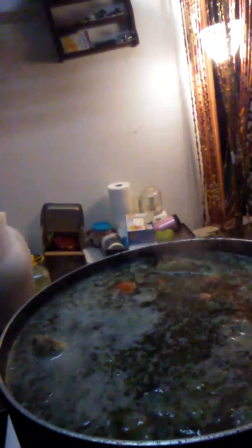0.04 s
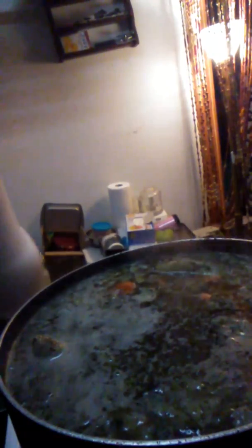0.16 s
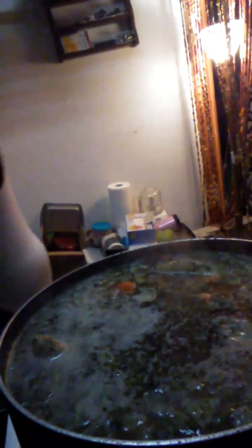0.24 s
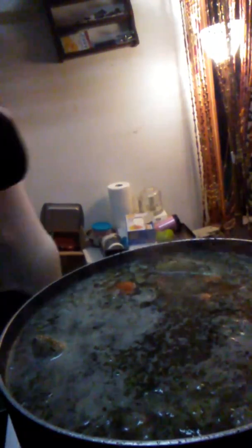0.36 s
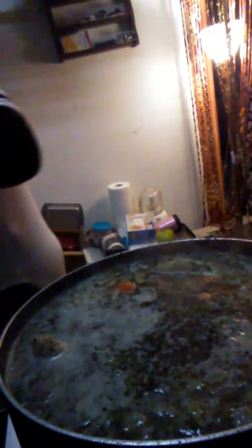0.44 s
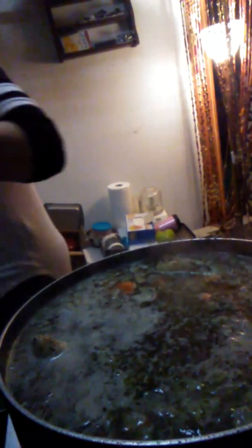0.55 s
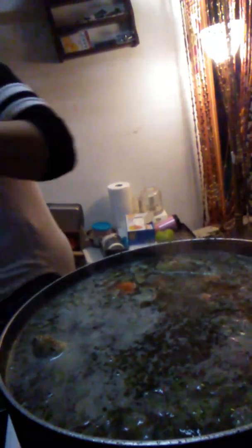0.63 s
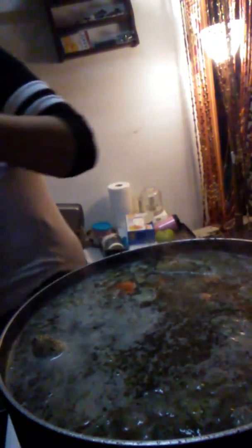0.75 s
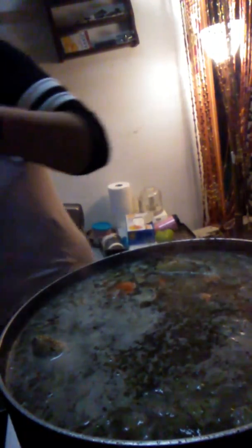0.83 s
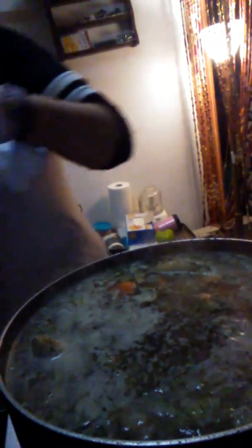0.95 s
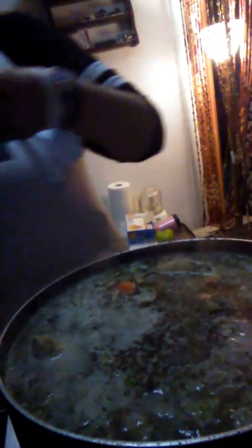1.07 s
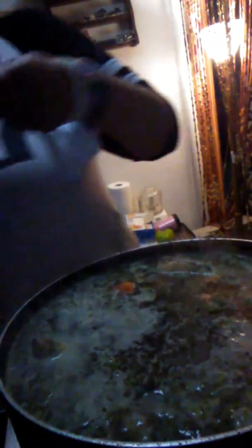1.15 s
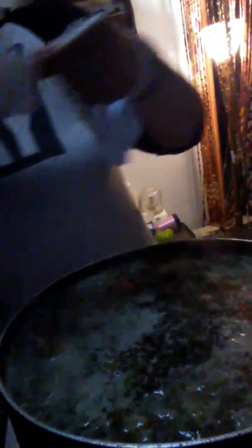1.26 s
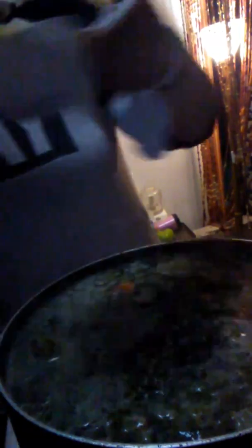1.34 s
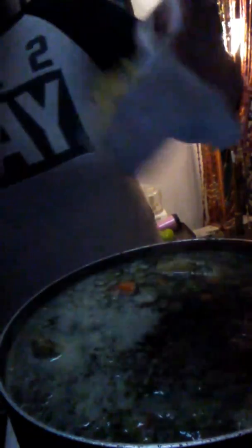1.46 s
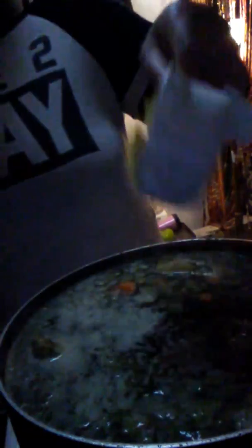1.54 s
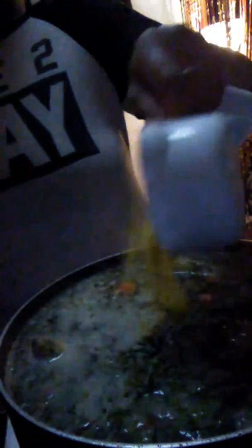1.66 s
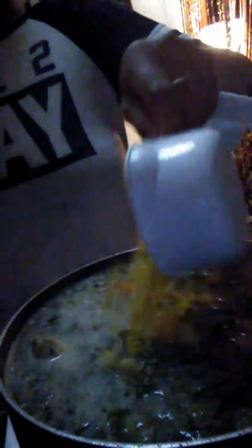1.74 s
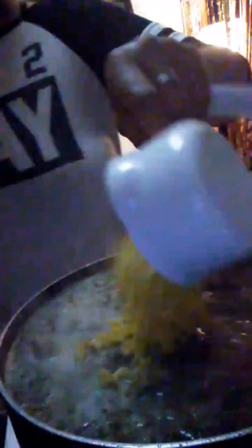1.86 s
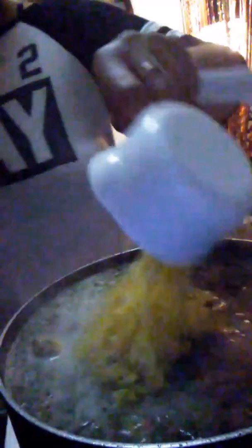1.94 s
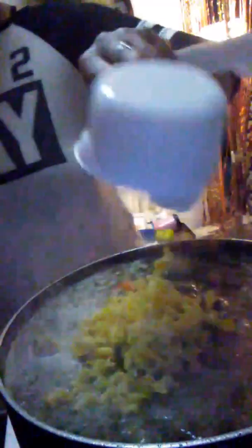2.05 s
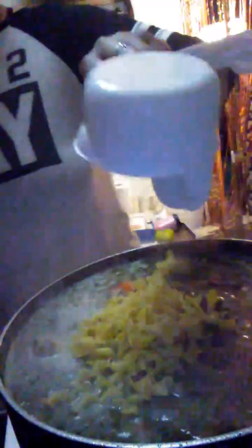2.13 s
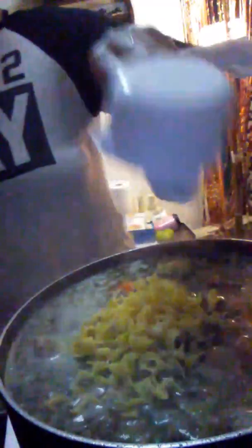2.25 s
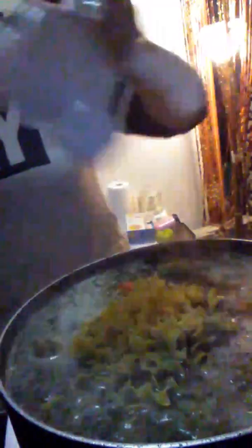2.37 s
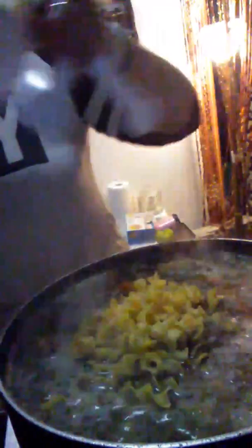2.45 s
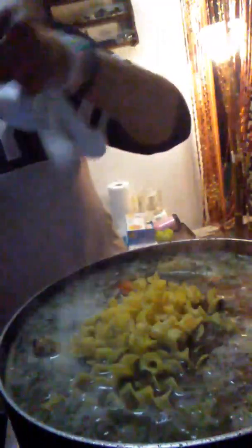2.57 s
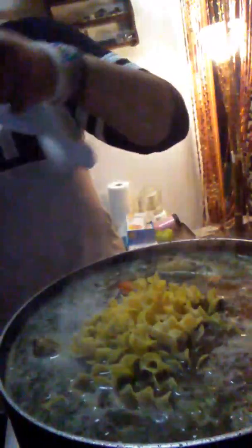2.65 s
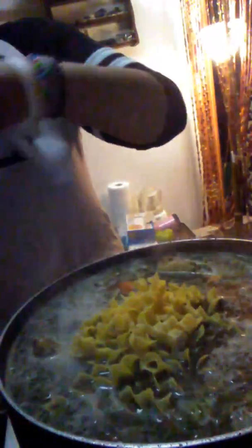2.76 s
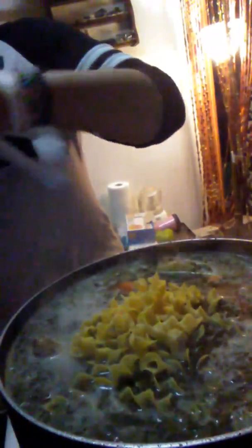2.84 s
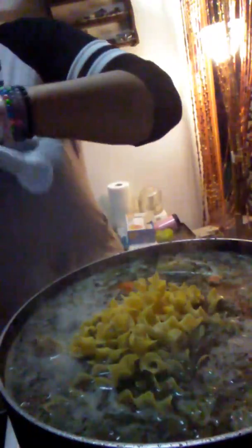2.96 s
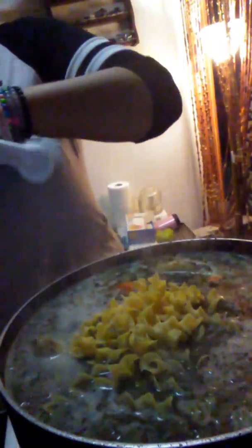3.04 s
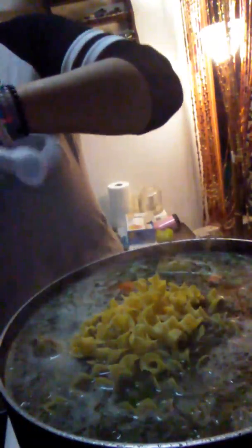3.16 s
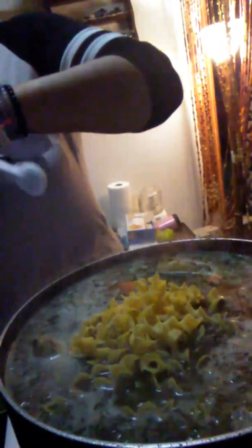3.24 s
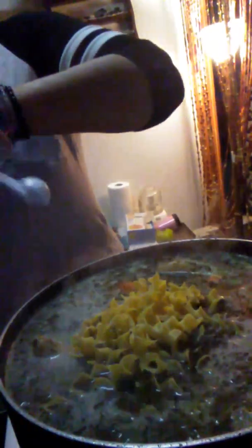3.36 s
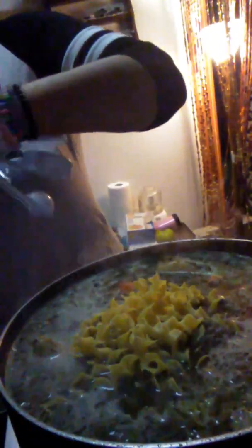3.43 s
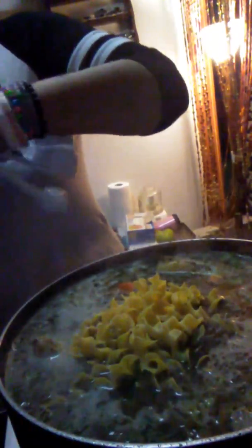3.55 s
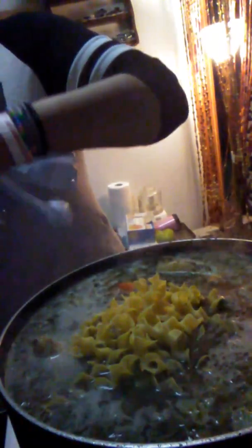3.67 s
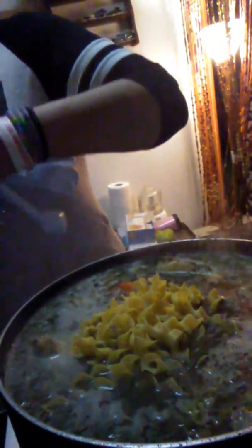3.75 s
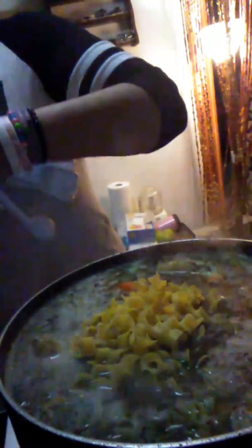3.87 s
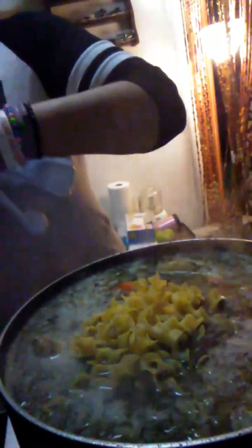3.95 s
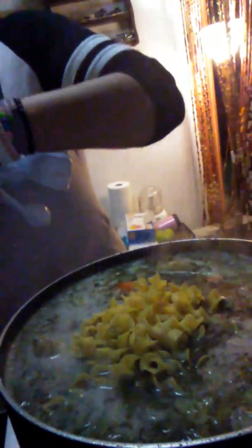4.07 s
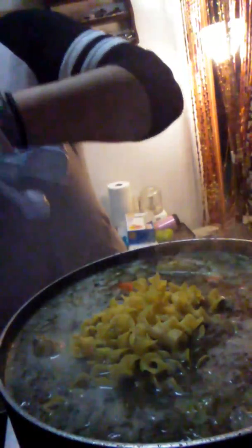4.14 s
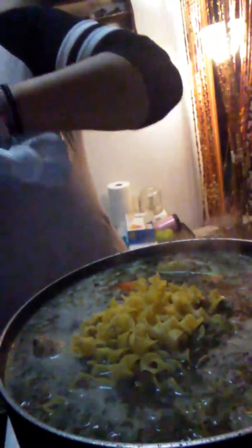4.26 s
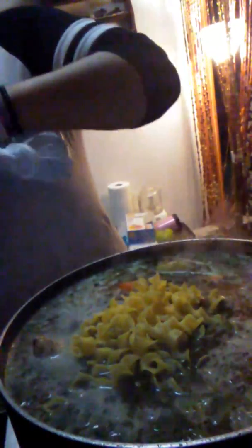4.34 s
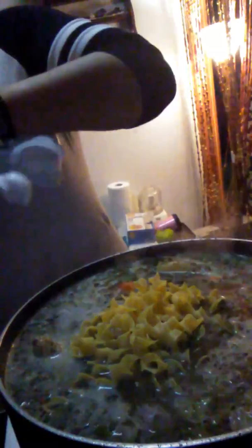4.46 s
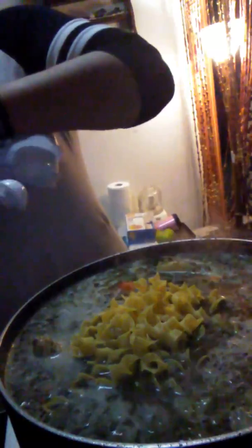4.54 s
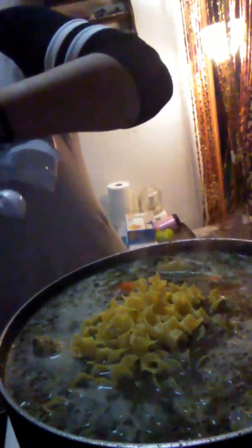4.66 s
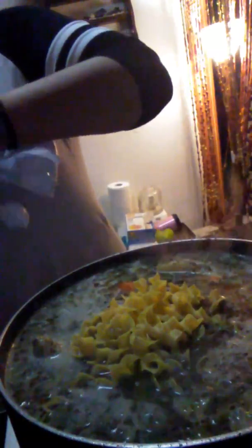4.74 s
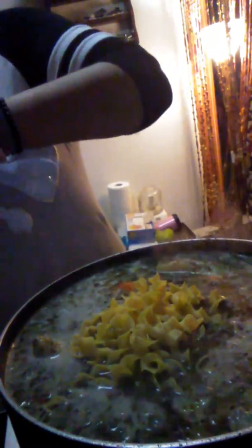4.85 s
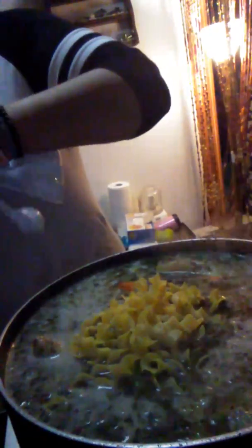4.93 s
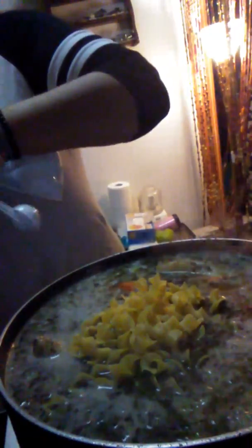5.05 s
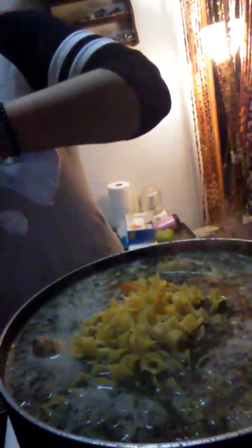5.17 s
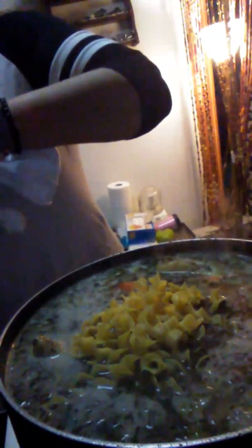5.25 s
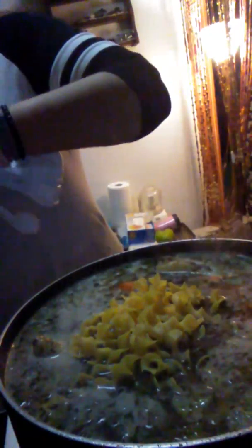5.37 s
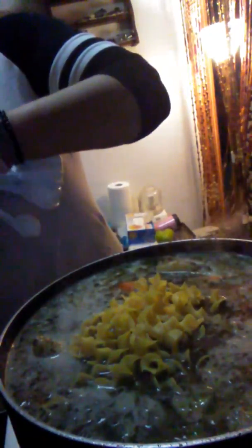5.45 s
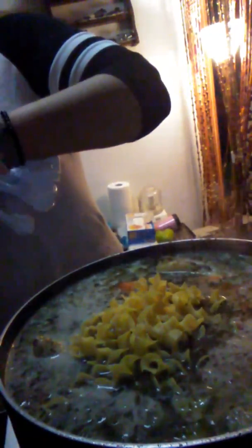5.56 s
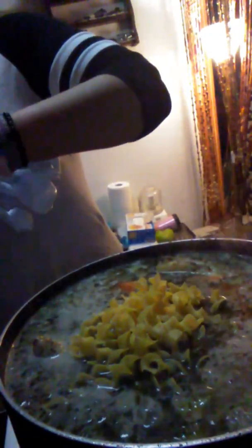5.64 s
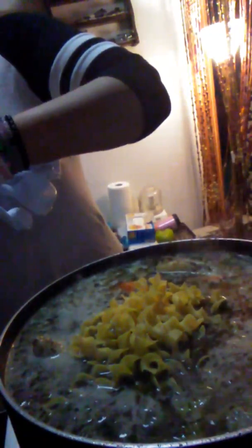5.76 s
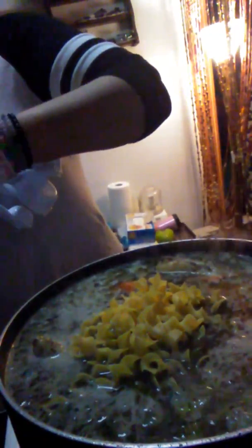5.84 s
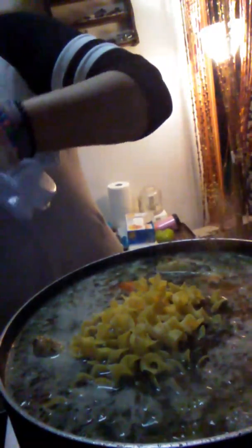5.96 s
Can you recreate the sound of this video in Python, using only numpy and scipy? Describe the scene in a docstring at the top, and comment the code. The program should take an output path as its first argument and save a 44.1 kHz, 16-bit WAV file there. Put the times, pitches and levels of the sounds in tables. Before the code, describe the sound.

Over faint simmering broth, scattered plastic crackles lead to a quick rattling pour of dry noodles, then long, dense crinkly shaking from a bag.

```python
"""In a small hard kitchen, beside a simmering pot, broth hiss and stove rumble run throughout as filtered noise.
Sparse snaps and crackle come first; then dry noodles are tipped from a plastic cup into the broth near 1.7 s.
After a lull, noodles are shaken from a crinkling bag into the cup from about 2.9 s to the end.
Random collisions ring small pieces and hollow air; single snaps, scrapes, thuds and cup knocks are placed one by one.
Rattle, snaps, scrapes and knocks feed short kitchen echoes; the microphone rolls off the bass and softens peaks."""
import sys
import numpy as np
from scipy import signal
from scipy.io import wavfile
from scipy.ndimage import uniform_filter1d

SR = 44100
rng = np.random.default_rng(int(sys.argv[2]) if len(sys.argv) > 2 else 0)


def transcribe(u):
    """Save the signal u as a 16-bit wav file named by the first command-line argument.

    u: samples, shape (n,) or (channels, n), limited to [-1, 1]; the rate is SR.
    q: integer samples, one column per channel.
    """
    v = np.clip(np.atleast_2d(u).T, -1, 1)
    q = np.round(v * 32767).astype(np.int16)
    wavfile.write(sys.argv[1], SR, q)


def invert_db(level):
    """Linear amplitude ratio for a level in decibels (20 dB per decade), elementwise."""
    return 10 ** (np.asarray(level, dtype=float) / 20)


N = 264776  # samples, about 6 s


def evened(x):
    """Scales to rms 1."""
    return x / np.sqrt(np.mean(x ** 2) + 1e-20)


def read(points, hz):
    """Reads a spectrum or decay table on a log-frequency axis."""
    f, value = np.transpose(points)
    return np.interp(np.log(hz + 1), np.log(f + 1), value)


def over_time(points):
    """Draws straight lines between (s, value) points, one value per sample."""
    s, value = np.transpose(points)
    return np.interp(np.arange(N) / SR, s, value)


def add(mix, s, sound):
    """Mixes a sound in at time s, cut off at the end of the mix."""
    part = mix[round(s * SR):][:len(sound)]
    part += sound[:len(part)]


def peaking(sound, db):
    """Scales to a peak level in dB."""
    return invert_db(db) * sound / abs(sound).max()


def colour(x, spectrum):
    """Minimum-phase filter: gives the spectrum without sounding ahead of the blow."""
    hz = abs(np.fft.fftfreq(4096, 1 / SR))
    log_gain = np.log(invert_db(np.maximum(read(spectrum, hz), -90)))
    taps = np.fft.ifft(np.exp(np.conj(signal.hilbert(log_gain)))).real[:2048]
    return signal.oaconvolve(x, taps)[:len(x)]


def resonate(x, hz, width):
    """A fixed resonance of gain 1, its width in Hz."""
    r = np.exp(-np.pi * width / SR)
    return 2 * signal.lfilter([1 - r], [1, -r * np.exp(2j * np.pi * hz / SR)], x).real


def ring(hz, t60, seconds):
    """One damped vibration, falling 60 dB in t60 seconds."""
    t = np.arange(round(seconds * SR)) / SR
    return invert_db(-60 * t / t60) * np.sin(2 * np.pi * hz * t)


def soft_ring(hz, t60, rise_s, seconds):
    """A damped vibration that is pushed rather than struck, so it starts gently."""
    t = np.arange(round(seconds * SR)) / SR
    return ring(hz, t60, seconds) * (1 - np.exp(-t / rise_s))


# Hiss of the broth, close by. Each row: frequency in Hz, relative density in dB.
SIMMER_SPECTRUM = [(88, -35), (150, -11), (169, -38), (213, 4), (484, -37), (612, -2), (702, -21),
                   (1690, -8.5), (2220, -30), (2760, -15.5), (3040, -49), (6770, -14.5), (16000, -36)]
SIMMER_DB, PATCHY_DB = -52, 3  # rms of the hiss, rms of its unevenness


def simmer():
    """Noise whose level wanders in patches of time and pitch, plus random blows ringing small bubbles."""
    frames, hz = N // 128 + 5, np.fft.rfftfreq(512, 1 / SR)
    real, imaginary, patches = rng.standard_normal((frames, 257, 3)).T
    patches = uniform_filter1d(patches, 5, axis=0)  # over frequency
    patches = evened(uniform_filter1d(patches, 12, axis=1))  # over time
    level_db = read(SIMMER_SPECTRUM, hz)[:, None] + PATCHY_DB * patches
    hiss = signal.istft((real + 1j * imaginary) * invert_db(level_db), nperseg=512, noverlap=384)[1][:N]
    blows = rng.standard_normal(N) * (rng.random(N) < 25 / SR)  # about 25 a second
    bubbles = resonate(blows, 560, 42)
    return invert_db(SIMMER_DB) * (evened(hiss) + invert_db(-19) * evened(bubbles))


# Stove rumble at the microphone. Each row: time in seconds, level in dB.
RUMBLE_LEVEL = [(0.04, -55), (0.29, -53), (0.49, -46), (0.92, -47), (1.2, -47.5), (1.88, -50), (2.06, -55),
                (2.91, -41.5), (3.39, -49), (3.58, -46), (4.01, -55), (4.49, -46), (4.95, -52), (6.0, -48)]


def rumble():
    """Lumpy low boiling: random thumps over faint noise drive two pairs of low resonances."""
    thumps = rng.standard_normal(N) * (0.082 + (rng.random(N) < 90 / SR))  # about 90 a second
    low = resonate(resonate(thumps, 55, 26), 81, 43)
    upper = resonate(resonate(thumps, 102, 82), 98, 100)
    return invert_db(over_time(RUMBLE_LEVEL)) * evened(evened(low) + invert_db(-11) * evened(upper))


# Changing stir under and between the shakes, strongest in the pour. Each row: time in seconds,
# rattle level in dB, hollow body in dB relative to the ticks, mid crackle in dB relative to the ticks.
STIR_LEVELS = [(0, -34, -16, -4.5), (.3, -52.5, -9.5, -3.5), (.75, -48.5, -10, -2), (.9, -57, -9, -0.5),
               (1.1, -42.5, -11, -6.5), (1.3, -48.5, -1.5, -8), (1.43, -43.5, -8, -3), (1.63, -58, -9, -12),
               (1.68, -35.5, -31, -10.5), (1.9, -22.5, -23.5, -9), (2.02, -19, -25.5, -9.5),
               (2.18, -28, -26, -12.5), (2.25, -52, -26, -20), (2.64, -60.5, -5.5, -3.5),
               (2.95, -45, -4, -1), (3.1, -25, -9, -3.5), (5.45, -30, -6.5, -1.5), (5.62, -38, -4, -1.5),
               (6, -31, -7, -1)]
# Shakes of cup or bag. Each row: start in seconds, rise in seconds, hold in seconds, level in dB,
# fullness added to crackle and body in dB.
SHAKE_LIST = [(0, 0.0011, 0.025, -32, 7), (0.097, .003, .004, -25, -9), (0.198, 0.035, 0.0067, -35, -3),
              (0.308, 0.032, 0.12, -35.5, 3), (0.506, 0.052, 0.0022, -37, -1),
              (0.648, 0.016, 0.0077, -30.5, 3), (0.707, 0.0032, 0.016, -28, 0.5),
              (0.942, 0.0022, .03, -33, 2), (1.004, 0.0027, 0.011, -21, -0.5), (1.303, 0.015, .01, -45, -4),
              (1.65, .035, 0.027, -48, -7), (1.687, .003, .003, -30, 0), (1.735, 0.0025, 0.015, -18.5, 1),
              (1.994, .004, 0.028, -17.5, -1.5), (2.262, .004, 0.0018, -41, -1),
              (2.33, 0.025, .002, -44.5, -4), (2.418, .02, .01, -51, 7), (2.67, .002, 0.0073, -29.5, 4),
              (2.715, .002, 0.027, -32.5, 0), (2.735, 0.0061, 0.011, -16.5, 0.5),
              (2.846, 0.003, 0.0033, -33, 1), (2.859, 0.0025, 0.014, -22, 1),
              (2.924, 0.072, 0.1, -16.5, -1), (3.134, 0.027, 0.072, -19.5, 2.5),
              (3.25, 0.015, 0.035, -19, -3.5), (3.315, 0.012, 0.012, -16, -1),
              (3.376, .07, 0.005, -15.5, 1.5), (3.484, 0.011, 0.013, -21, 1.5),
              (3.55, .002, 0.035, -18.5, -0.5), (3.606, 0.044, 0.11, -14, 1),
              (3.84, 0.014, 0.065, -21.5, -4), (3.912, 0.016, 0.0052, -16.5, 4),
              (3.958, 0.013, 0.08, -15, 1), (4.167, .002, 0.031, -21.5, 1.5),
              (4.213, 0.017, 0.045, -17, 3.5), (4.26, 0.054, 0.05, -14, 0),
              (4.408, 0.0048, 0.081, -17.5, -1), (4.488, 0.026, 0.14, -23, 1.5),
              (4.656, 0.025, 0.047, -19.5, -0.5), (4.826, 0.045, 0.032, -18, -1),
              (4.92, 0.016, 0.075, -23, -1), (5.03, 0.011, 0.049, -16, -0.5),
              (5.194, 0.028, 0.072, -20, 2.5), (5.276, 0.048, 0.016, -16, 1),
              (5.373, 0.018, 0.16, -23.5, -1), (5.495, 0.038, 0.0016, -14.5, -1),
              (5.653, 0.0065, 0.047, -21.5, 0.5), (5.695, 0.074, 0.0033, -16.5, -1.5),
              (5.877, 0.0037, 0.067, -28, 2.5), (5.947, .002, 0.032, -31, -0.5)]
SWELL_DB, FALL_DB_PER_S = 12.5, 310  # climb during the rise, fall after the hold


def handling():
    """Level of the rattle (stir and shakes summed as power) and the fullness of whichever leads."""
    u = np.arange(SR // 2) / SR
    s, stir_db = np.transpose(STIR_LEVELS)[:2]
    power = invert_db(2 * np.interp(np.arange(N) / SR, s, stir_db))
    full = np.zeros(N)
    for s, rise, hold, db, full_db in SHAKE_LIST:
        below_top = SWELL_DB * np.maximum(1 - u / rise, 0)
        fallen = FALL_DB_PER_S * np.maximum(u - rise - hold, 0)
        shake = invert_db(2 * (db - below_top - fallen))
        add(power, s, shake)
        add(full, s, full_db * shake)
    return 10 * np.log10(power), full / power


def quick_swell(db):
    """How far the level stands over its own recent past (0.094 s lag), within 8 dB either way."""
    keep = np.exp(-1 / (0.094 * SR))
    change = db - db[0]
    return np.clip(change - signal.lfilter([1 - keep], [1, -keep], change), -8, 8)


def collisions(per_s, spread_db, clump_db, clump_s):
    """Many pieces collide at random in clumps; a few blows are large. Same power at any rate."""
    clumps = evened(uniform_filter1d(rng.standard_normal(N), max(round(clump_s * SR), 2)))
    size = invert_db(spread_db * np.minimum(rng.exponential(1, N), 4) + clump_db * clumps)
    struck = rng.random(N) < per_s / SR
    return size * struck * rng.choice([-1, 1], N) / np.sqrt(per_s)


def pieces(blows, click, t60, lo_hz, hi_hz, count=48):
    """Each blow is a dry click plus four short modes of the piece it hits."""
    piece, out = rng.integers(0, count, N), click * blows
    modes = np.linspace(lo_hz, hi_hz, 4 * count)  # together they cover the band evenly
    modes = rng.permutation(modes).reshape(count, 4)
    for k in range(count):
        ringing = sum(ring(hz, t60, .012) for hz in modes[k])
        out += signal.oaconvolve(blows * (piece == k), ringing)[:N]
    return out


# Brittle ticks as the microphone colours them. Each row: frequency in Hz, relative density in dB.
TICK_SPECTRUM = [(2530, -28.5), (4300, -13), (5280, -3.5), (5710, 0), (6110, 1), (6490, 3), (7980, 2),
                 (10400, -7), (14100, -13.5), (15700, -25), (16300, -51)]
# Duller crackle of folds. Each row: frequency in Hz, relative density in dB.
CRACKLE_SPECTRUM = [(530, -21), (900, -1.5), (1120, -2), (1370, 2.5), (1590, -1.5), (2880, 5.5),
                    (4660, 4.5), (5600, 0.5), (7280, -10), (12300, -120)]
# Air in cup and bag. Each row: frequency in Hz, width in Hz, relative level in dB.
HOLLOW_MODES = [(191.6, 66, 4), (316, 30, -0.5), (447, 103, 10), (582, 200, 5.5), (740, 21, 9),
                (854, 78, -9.5)]
# Crackle under SPLIT_HZ, thinnest at the start. Each row: time in seconds, gain in dB.
LOW_CRACKLE_GAIN = [(0, -16), (1, 0), (1.6, -6), (2.2, -4), (2.7, -0.5), (4, -1), (6, -4)]
SPLIT_HZ = 1400
BODY_LAG, CRACKLE_LAG = 0.47, 0.3  # shares of a quick swell that body and crackle do not follow


def rattle():
    """Ticks, crackle and the hollow body follow the handling; harder handling means more collisions."""
    s, _, stir_body_db, stir_crackle_db = np.transpose(STIR_LEVELS)
    t = np.arange(N) / SR
    db, full_db = handling()
    quick_db = quick_swell(db)
    body_db = np.interp(t, s, stir_body_db) + full_db - BODY_LAG * quick_db
    crackle_db = np.interp(t, s, stir_crackle_db) + full_db - CRACKLE_LAG * quick_db

    busy = .3 + invert_db(.8 * (db + np.minimum(crackle_db, 0) + 20.5))
    noodles = collisions(per_s=5000 * busy, spread_db=2.5, clump_db=1.9, clump_s=0.0061)
    folds = collisions(per_s=3500 * busy, spread_db=2, clump_db=2.43, clump_s=0.02)

    ticks = colour(pieces(noodles, click=3.1, t60=0.0034, lo_hz=2500, hi_hz=17200), TICK_SPECTRUM)
    struck_folds = pieces(folds, click=2.8, t60=.006, lo_hz=600, hi_hz=7080)
    crackle = colour(struck_folds + 3 * noodles, CRACKLE_SPECTRUM)
    low = signal.sosfiltfilt(signal.butter(2, SPLIT_HZ, fs=SR, output="sos"), crackle)
    crackle = crackle - low + invert_db(over_time(LOW_CRACKLE_GAIN)) * low
    body = sum(invert_db(d) * resonate(folds + noodles, hz, width) for hz, width, d in HOLLOW_MODES)

    mixed = evened(ticks) + invert_db(crackle_db) * evened(crackle) + invert_db(body_db) * evened(body)
    return invert_db(db) * mixed


# Single snaps of bag and noodles. Each row: time in seconds, peak in dB, centre in Hz,
# tick-coloured wide part in dB relative to the centre, crackle-coloured lower part in dB likewise.
SNAP_LIST = [(0.0165, -20, 6500, -3, -15), (0.0973, -11, 5400, -4, -16), (0.2117, -21, 6890, 6, -15),
             (0.3217, -24, 7780, 2, -15), (0.341, -17, 8260, 2, -19), (0.3894, -12.5, 6960, 4, -17),
             (0.527, -16.5, 6900, 0, -1), (0.5581, -20, 5670, 2, -16), (0.6285, -31, 6880, 2, -11),
             (0.6614, -29, 5780, -2, -18), (0.7098, -18, 6200, 4, -12), (0.7528, -17.5, 6400, -4, -17),
             (0.805, -23, 3160, -2, -11), (0.9418, -18, 8340, 6, -15), (0.9597, -14, 5630, 6, -10),
             (1.0094, -6.5, 6150, -2, -24), (1.1605, -23, 7260, 2, -19), (1.2057, -41, 5730, 2, -15),
             (1.2374, -39, 6900, -7, -11), (1.323, -17.5, 6800, 5, -32), (1.5524, -32, 2760, -3, -8),
             (1.634, -37, 6460, 2, -24), (1.6621, -20, 6800, 2, -41), (1.6839, -4.5, 8050, 5, -34),
             (1.7385, -1, 6440, 11, -28), (1.7997, -16, 6470, 2, -20), (1.8195, -3.5, 6460, 19, -24),
             (1.8562, -12, 6450, 9, -23), (1.8884, 2.5, 5800, 9, -27), (1.951, -8, 5770, 2, -20),
             (1.9954, -2, 7100, 2, -25), (2.136, -4, 6600, 4, -18), (2.1817, -19, 7800, 2, -25),
             (2.262, -30, 7900, 2, -14), (2.4307, -32, 3010, 12, -8), (2.6725, -24, 7160, 2, -14),
             (2.7152, -18, 3380, 0.5, -8), (2.7397, -12, 7160, 2, -16), (2.8414, -8.5, 6550, 2, -14),
             (2.8632, -8, 6500, 2, -15), (2.9034, -12, 8280, 2, -16), (2.9925, -3.5, 8040, 2, -15),
             (3.0967, -2, 5900, 9, -21), (3.1168, 2.5, 5440, 3, -16), (3.1742, 1, 6960, -2, -14),
             (3.2386, 0, 6100, 5, -19), (3.2818, -3, 7100, 2, -16), (3.3613, 1.5, 3640, 0, -9),
             (3.4033, 1, 7350, 13, -20), (3.4486, -1, 6340, -2, -11), (3.5518, 0, 6300, 7, -18),
             (3.8425, -8, 7070, 9, -19), (3.9675, -15, 6630, 0, -13), (4.168, -3, 7290, 4, -20),
             (4.2353, -3, 6400, -4, -15), (4.2944, -6, 6170, 1.5, -8), (4.3384, -3, 6600, -3, -16),
             (4.4133, -1, 6310, -3, -18), (4.454, 0, 6850, -3, -19), (4.5264, 0, 6500, -2.5, -15.5),
             (4.7066, -4.5, 3720, -3, -15), (4.8254, -3.5, 6940, 2, -7), (4.88, -3, 7080, 8, -18),
             (4.9926, -1.5, 6900, -12, -19), (5.0409, -7, 6250, -4, -16), (5.1496, -7, 2680, 13, -16),
             (5.2182, -10, 6260, 7, -14), (5.269, -3, 6370, 4, -13), (5.3124, -1, 7180, 8, -16),
             (5.515, -4.5, 3680, -5, -15), (5.657, -9, 7040, 8, -16), (5.8344, -3.5, 2660, -1, -3.5),
             (5.8837, -6, 7030, -5, -3), (5.951, -8, 7080, 9, -16)]


def snaps():
    """A sharp crack and a few quick rebounds (spiky cubed noise), ringing near its own centre."""
    out, t = np.zeros(N), np.arange(2000) / SR
    bursts = rng.standard_normal((len(SNAP_LIST), 2000))
    for (s, db, hz, wide_db, low_db), burst in zip(SNAP_LIST, bursts):
        crack = (burst ** 3 + 26 * (t == 0)) * invert_db(-60 * t / 0.026)  # t60 0.026 s
        centre = evened(resonate(resonate(crack, hz, 460), hz, 1800))
        wide = invert_db(wide_db) * evened(colour(crack, TICK_SPECTRUM))
        lower = invert_db(low_db) * evened(colour(crack, CRACKLE_SPECTRUM))
        add(out, s, peaking(centre + wide + lower, db))
    return out


# Short narrow scrapes of a noodle or fold sliding. Each row: start in seconds,
# rms in dB before the fades, centre in Hz, width of each resonance in Hz, length in seconds.
SCRAPE_LIST = [(0.109, -35.5, 2500, 700, 0.044), (0.208, -36.5, 2400, 600, 0.02),
               (0.226, -34, 6200, 1500, 0.055), (0.557, -32, 5100, 1500, 0.028),
               (1.048, -27.5, 4050, 800, 0.02), (1.198, -41, 6270, 1500, 0.032),
               (1.312, -31, 6860, 1400, 0.043), (1.55, -50, 2780, 600, 0.025), (1.57, -52, 6800, 500, .04),
               (1.652, -33, 6270, 1300, 0.065), (1.884, -22, 5730, 400, 0.017),
               (2.26, -43, 3050, 1200, 0.016), (2.437, -49, 404, 120, 0.033),
               (2.439, -42, 2150, 2500, 0.019), (2.75, -32, 2790, 500, 0.029)]


def scrapes():
    """Noise in a steep double resonance, quick to rise and slower to die."""
    out = np.zeros(N)
    hisses = rng.standard_normal((len(SCRAPE_LIST), 5000))
    for (s, db, hz, width, length), hiss in zip(SCRAPE_LIST, hisses):
        u = np.arange(5000) / SR / length
        fades = (1 - np.exp(-u / 0.04)) * np.exp(-u ** 3.2)
        narrow = evened(resonate(resonate(hiss, hz, width), hz, width))
        add(out, s, invert_db(db) * narrow * fades)
    return out


# Dull thuds of handfuls landing and of the cup being gripped.
# Each row: start in seconds, peak in dB, frequency in Hz.
THUD_LIST = [(.335, -40, 483), (.385, -41, 470), (.715, -40, 570), (.9, -45, 730), (1.755, -40, 600),
             (2.669, -30, 664), (2.766, -22.5, 500), (1.009, -37.5, 194), (1.954, -38, 180), (2, -32, 144)]
# Bubbles under the pot bottom. Each row: start in seconds, peak in dB, frequency in Hz.
PLOP_LIST = [(0.447, -38, 777), (0.57, -38, 760), (0.668, -31.5, 620), (1.546, -42, 610),
             (1.649, -39.5, 617), (1.867, -35.5, 630), (2.127, -38.5, 626), (2.275, -45, 610),
             (2.31, -51, 625), (2.367, -49, 620), (2.477, -50, 615), (2.567, -42.5, 636)]


def thuds_and_plops():
    """Thuds and steam bubbles alike are short damped tones with a soft start."""
    out = np.zeros(N)
    for s, db, hz in PLOP_LIST + THUD_LIST:
        add(out, s, peaking(soft_ring(hz, t60=0.059, rise_s=0.0083, seconds=.12), db))
    return out


# Low bumps of hands and pot through the stove top. Each row: start in seconds, peak in dB, frequency in Hz.
BUMP_LIST = [(0.374, -41, 51.1), (0.374, -33.5, 62), (0.699, -38.5, 77.5), (0.9, -39, 64.6),
             (1.003, -38, 56), (1.236, -38.5, 87), (2.362, -36.5, 72.7), (2.722, -38, 78.1),
             (2.859, -37.5, 83.4), (3.021, -34, 108), (3.021, -29, 72), (3.159, -35, 109),
             (3.483, -33, 70.0), (3.549, -36, 61.9), (3.648, -34, 107.5), (3.908, -39, 83.4),
             (4.221, -33, 105), (4.321, -32.5, 61.6), (4.402, -33, 83.4), (4.81, -45, 77),
             (4.916, -42, 75.4), (5.024, -31, 75), (5.305, -37, 108), (5.474, -39, 80.7),
             (5.692, -31.5, 88.8), (5.864, -38, 83.4)]


def bumps():
    """A few soft cycles of deep bass for each bump."""
    out = np.zeros(N)
    for s, db, hz in BUMP_LIST:
        add(out, s, peaking(soft_ring(hz, t60=0.18, rise_s=0.011, seconds=.25), db))
    return out


# Knocks on the cup. Each row: start in seconds, peak in dB, pitch factor of the grip, upper modes in relative dB.
KNOCK_LIST = [(1.744, -31, 1.12, -8), (1.764, -26, 1.12, -10), (1.826, -31, 1.12, -1),
              (2.138, -23.5, 1.12, 2), (2.147, -30.5, 1.12, -5), (2.16, -35, 1.12, -12), (2.639, -25, 1, 1),
              (2.645, -26, 0.95, 3), (2.657, -30, 1.14, -21), (2.723, -17, 1.02, 8), (3.925, -24, 1.8, 6),
              (3.945, -18, 1.13, -12), (3.962, -12.5, 1.27, -12), (3.995, -13, 1.3, -6),
              (4.012, -12, 1.44, -15), (4.032, -18, 1.14, -13)]
# Modes of the plastic cup. Each row: frequency in Hz before the grip factor,
# level in dB before the upper-mode change and the knock's peak, t60 in seconds.
CUP_MODES = [(1138, 11.5, 0.082), (1593, 9.5, 0.1), (2200, 6.5, 0.09)]


def cup():
    """Soft blows with a few ms of chatter ring the plastic cup's modes; the grip shifts them."""
    out, contact = np.zeros(N), signal.windows.hann(18)  # the contact rounds off the blow
    chatters = rng.standard_normal((len(KNOCK_LIST), 220))
    for (s, db, grip, upper_db), chatter in zip(KNOCK_LIST, chatters):
        modes = 0
        for k, (hz, mode_db, t60) in enumerate(CUP_MODES):
            modes = modes + invert_db(mode_db + upper_db * (k > 0)) * ring(hz * grip, t60, .15)
        chattering = 0.035 * np.convolve(modes, chatter)[:len(modes)]
        add(out, s, peaking(np.convolve(modes + chattering, contact), db))
    return out


# Echo decay of the small hard kitchen. Each row: frequency in Hz, t60 in seconds.
KITCHEN_DECAY = [(250, 0.15), (700, 0.25), (1800, 0.37), (4600, 0.27), (8000, 0.27), (13000, 0.23)]


def kitchen(x, count=8):
    """Sparse echo tails fed in turn at a fixed rate, each band dying at its own speed."""
    slots = np.arange(60, SR // 2 - 20, 20)  # one echo of random sign in every 20 samples
    taps = np.zeros((count, SR // 2))
    at = slots + rng.integers(0, 20, (count, len(slots)))
    np.put_along_axis(taps, at, rng.choice([-1., 1.], at.shape), 1)
    hz, t, z = signal.stft(taps, SR, nperseg=128)
    decay = invert_db(-60 * t / read(KITCHEN_DECAY, hz)[:, None])
    tails = signal.istft(z * decay, SR, nperseg=128)[1]
    # the feed crossfades to the next tail 60 times a second
    turn = (np.arange(N) / SR * 60 - np.arange(count)[:, None]) % count - 1
    feeds = x * np.cos(np.pi / 2 * np.clip(turn, -1, 1))
    return signal.fftconvolve(feeds, tails / np.linalg.norm(tails[0]), axes=1)[:, :N].sum(0)


def scene():
    """Rattle, snaps, scrapes and cup knocks ring the kitchen; pot, stove, thuds and bumps stay dry."""
    ringing = rattle() + snaps() + scrapes() + cup()
    unechoed = simmer() + rumble() + thuds_and_plops() + bumps()
    return (ringing + invert_db(-8) * kitchen(ringing) + unechoed)[None]


def roll_off(x):
    """The treble ends steeply here."""
    return signal.sosfilt(signal.butter(12, 16440, fs=SR, output="sos"), x)


def record(dry):
    """Bass roll-off of the microphone, soft overload of the loudest cracks, then a band limit."""
    heard = signal.sosfilt(signal.butter(2, 45, "high", fs=SR, output="sos"), dry)
    held = .84 * np.tanh(heard / .84)
    edge = signal.firwin(255, 16200, window=("kaiser", 8), fs=SR)
    finished = signal.oaconvolve(held, edge[None], "same")
    return roll_off(finished)


dry = scene()
out = record(dry)
transcribe(out)
```